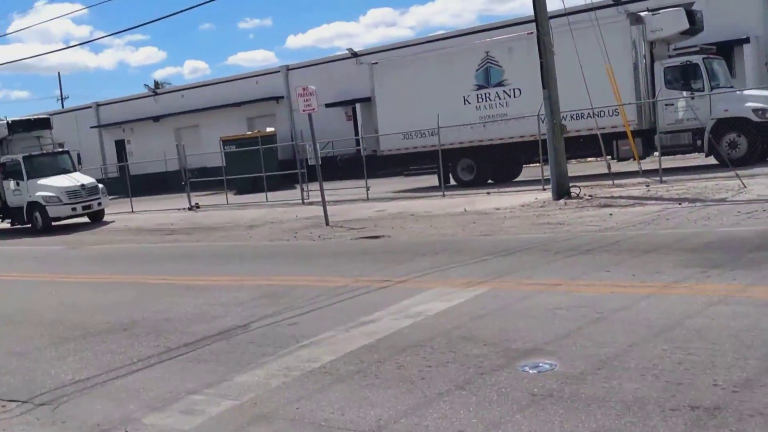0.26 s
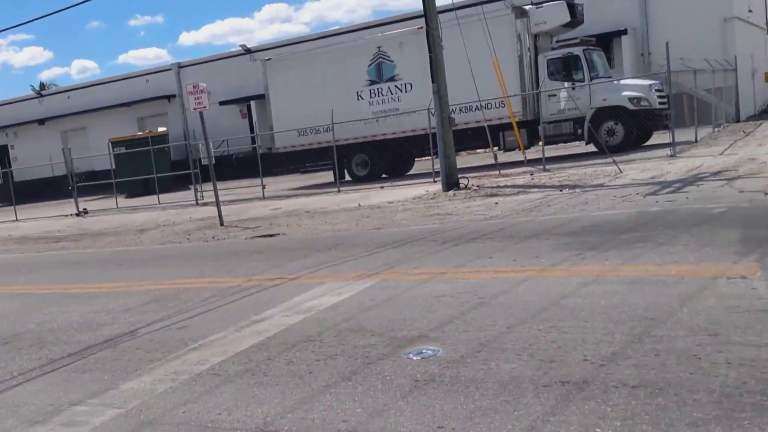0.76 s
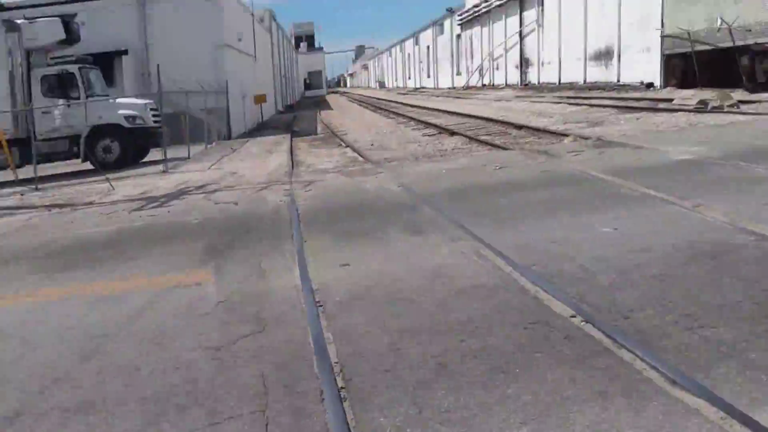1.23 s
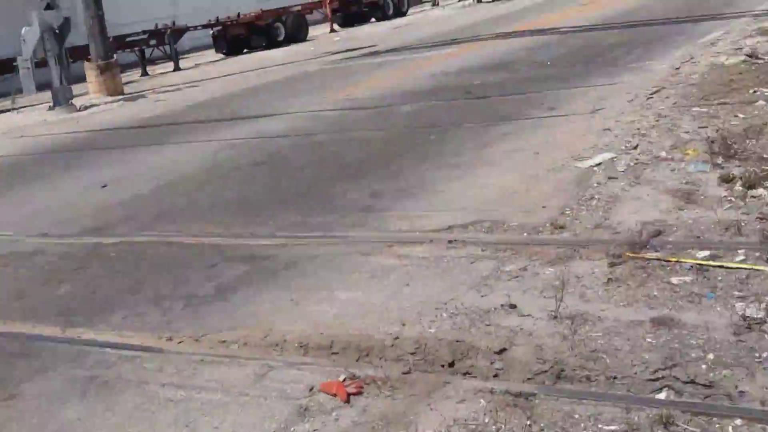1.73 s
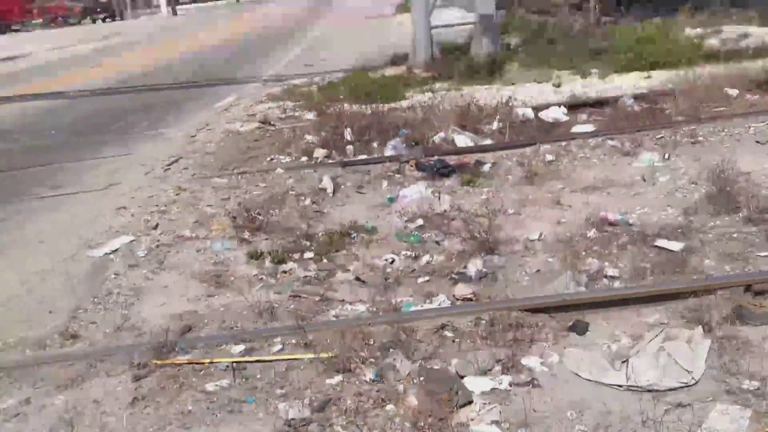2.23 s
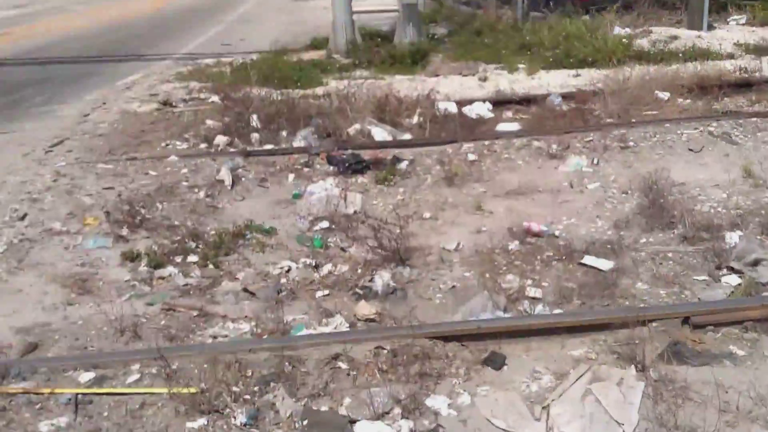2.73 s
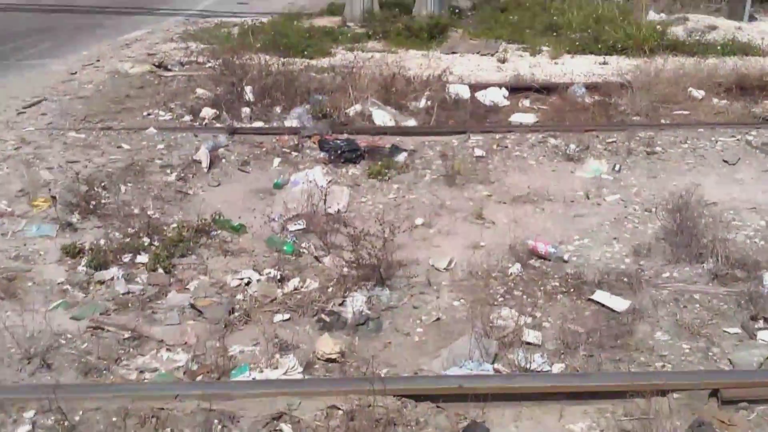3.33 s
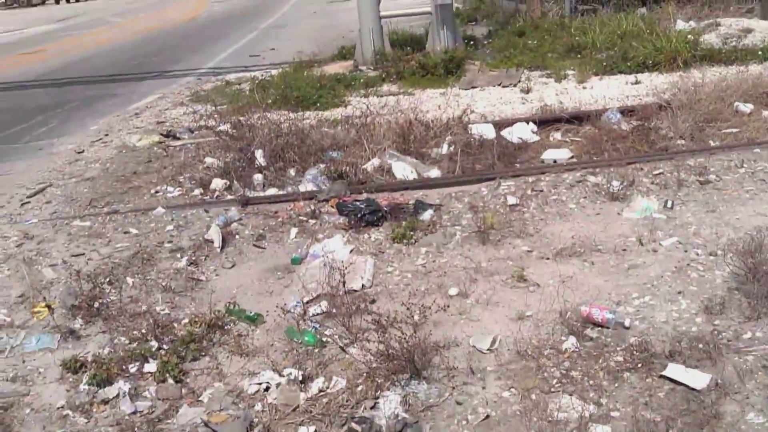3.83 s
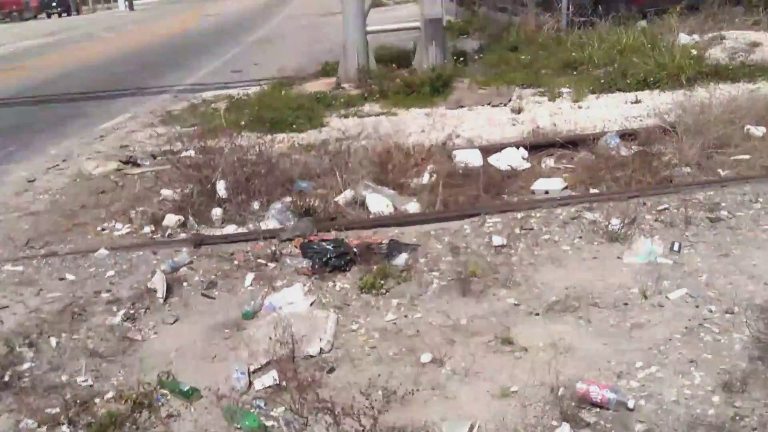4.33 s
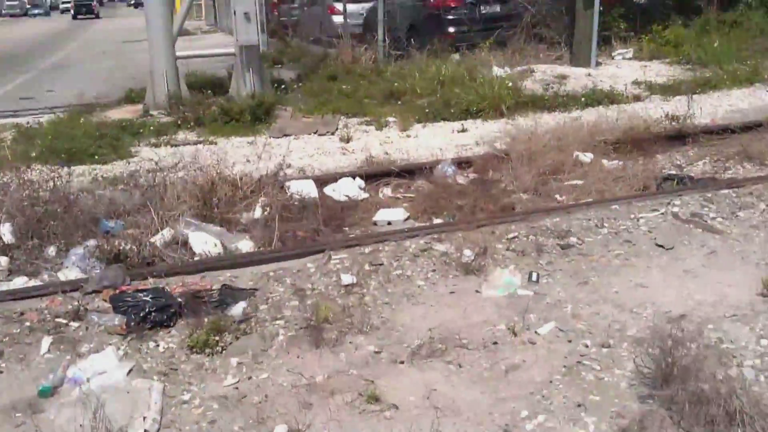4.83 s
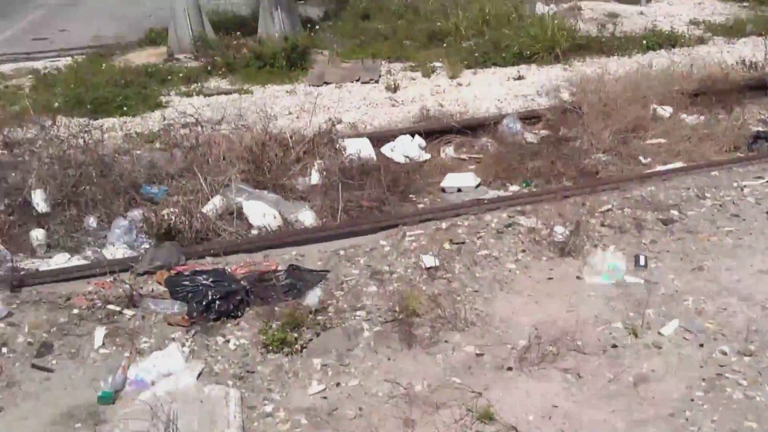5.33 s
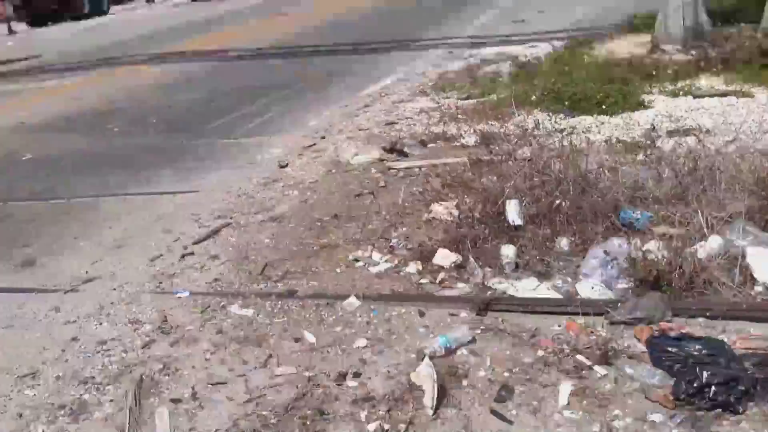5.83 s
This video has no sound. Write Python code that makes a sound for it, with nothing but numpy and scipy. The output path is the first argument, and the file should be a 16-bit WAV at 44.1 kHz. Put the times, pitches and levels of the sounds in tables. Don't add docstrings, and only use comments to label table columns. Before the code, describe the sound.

From the start, a truck releases brake air: a dense, bright hiss with whistling, breathy pipe tones that waver in strength as the camera turns, mostly towards the left, with a stronger spit near 1.3 s. At about 1.74 s a crisp valve snap cuts it dead. A little grit crackles around 1.95 s, then a sharp knock on the camera's left side at 2.0 s pulls the level down; it recovers over a second. Even street traffic remains: low rumble, tyre roar, soft high hiss, an unsteady diesel idle, and muffled lorry growls near 3.9, 4.7 and 5.5 s. Low wind thumps strike one microphone or the other throughout, with a gusty buffet around 3.9 s. Gravel snaps underfoot at 3.4 s, crushes fully at 4.7 to 4.9 s, scuffs at 5.5 s, and crunches again at 5.8 s. Another heavy wind thud dips the level just before the end.

```python
import sys
import numpy as np
from scipy import signal
from scipy.fft import rfft, irfft, next_fast_len
from scipy.io import wavfile
from scipy.ndimage import uniform_filter1d, map_coordinates

SR = 44100
rng = np.random.default_rng(int(sys.argv[2]) if len(sys.argv) > 2 else 0)


def amplitude_ratio(level_db):
    exponent = np.asarray(level_db, float) / 20
    return 10 ** exponent


def wav_out(sig):
    wavfile.write(sys.argv[1], SR, np.round(np.clip(np.atleast_2d(sig).T, -1, 1) * 32767).astype(np.int16))


N = 267554

# (time [s], level [dB], aim at the camera [dB], left against right [dB])
BRAKE_AIR = [(0.0, -32, -6, 0.5), (0.17, -32.5, 2, 1), (0.23, -36, 6.5, 7.5), (0.65, -29.5, -9, 2),
             (0.82, -31, 0.5, 1.5), (1.05, -33, -3, -2), (1.25, -31, -2.5, 7), (1.49, -30.5, 1.5, 1),
             (1.7, -35.5, 3, 4.5)]
# (time [s], half length [s], level [dB])
VALVE = (1.736, .009, -22.5)
# (frequency [Hz], level [dB])
JET_COLOUR = [(5000, -58), (5250, -5.5), (5500, -6.5), (6000, -3.5), (6500, 2), (6900, 3.5), (7600, 0),
              (8400, 1), (9200, -1), (10500, -22)]
WHISTLE_COLOUR = [(7800, -20), (8900, -1), (9800, -2.5), (10400, -2), (10750, -6), (11200, -39)]
NOZZLE_COLOUR = [(900, -43), (1250, -20), (1650, 8), (2000, 4), (2300, 7.5), (2500, -1), (3150, -49),
                 (3280, 7.5), (3600, 6.5), (4000, 3), (4350, -9), (4550, 10), (4700, -5), (5000, -32)]
EDGE_COLOUR = [(10400, -19), (10900, 3), (11900, -1.5), (12700, 3), (13250, 1), (13700, -3), (14200, -3),
               (14500, -26)]
SNAP_COLOUR = [(1500, -20), (2100, -2), (3000, -2), (4500, 0), (5200, -12), (7500, -14), (10000, -3),
               (12000, -7), (14000, -16)]
# (level [dB], share of the aim [ratio])
SIDE_TONES = [
    (-0.3, 0.76),
    (-8.5, 0.16),
    (-7, 0.5),
]
# (frequency [Hz], level [dB])
THROAT_COLOUR = [(2250, -25), (2450, 8.5), (2800, 2), (3020, -9), (3100, -40)]
SHOULDER_COLOUR = [(4550, -32), (4720, 1), (4900, -6), (5100, 9), (5250, -30)]
SPIT_COLOUR = [(4850, -30), (5050, -3), (5300, 7), (5800, -8), (6300, -30)]
# (time [s], level [dB], right port against left [ratio, minus = opposed])
THROAT_SWING = [(0, -45, 0.36), (.12, -45.5, 0.16), (.31, -47, -0.19), (.36, -46, -1.25), (.45, -36, -0.34),
                (.5, -45, -1.25), (.59, -40, -1.25), (.62, -44, -0.2), (.95, -43.5, 0.58),
                (1.23, -40.5, 0.51), (1.27, -41, -1.25), (1.33, -41, -0.29), (1.46, -42, 0),
                (1.49, -45, -1.5), (1.61, -40, -1.4), (1.64, -43, -0.013)]
# (time [s], level [dB])
SHOULDER_SWING = [(0, -52), (.11, -43), (.19, -51), (.36, -47), (.43, -54), (.55, -49), (.62, -41),
                  (.82, -42.5), (1, -43), (1.07, -56), (1.13, -43), (1.26, -33), (1.4, -45), (1.47, -44),
                  (1.52, -58), (1.59, -41), (1.66, -52), (1.7, -41)]
# (time [s], half length [s], level [dB])
SPITS = [
    (.11, .03, -46),
    (.5, 0.066, -47),
    (.8, 0.076, -40),
    (1.13, 0.099, -40),
    (1.27, 0.062, -34.5),
]

# (time [s], half length [s], level [dB])
CRUNCHES = [
    (1.955, 0.0067, -33.5),
    (1.992, 0.015, -37),
    (3.368, 0.011, -34.5),
    (4.746, 0.027, -34.5),
    (4.837, 0.066, -30),
    (4.904, 0.005, -36),
    (5.455, 0.051, -39),
    (5.797, 0.04, -32),
    (5.844, 0.018, -50),
    (5.92, 0.023, -55),
]
# (time [s], peak [dB], pitch [Hz], bright edge [dB])
STONES = [(1.856, -19, 734, -8), (1.952, -22, 700, -11), (3.3596, -8.5, 1210, -15), (3.3695, -8, 744, -27),
          (4.73, -16, 557, -25), (4.751, -9, 662, -18), (4.758, -14, 662, -19), (4.785, -10, 770, -21),
          (4.798, -4, 520, -24), (4.825, -9, 920, -11), (4.843, -19, 624, 8), (4.854, -14, 600, -21),
          (4.861, -12, 500, -22), (4.8765, -7, 700, -26), (4.9, -6, 1020, -22), (4.922, -17, 600, -25),
          (5.596, -11.5, 1020, -9), (5.77, -11, 540, -20), (5.785, -17, 937, -20), (5.792, -11, 900, -20),
          (5.802, -7, 840, -5), (5.8064, -7.5, 960, -6), (5.8115, -10, 650, -20), (5.827, -10, 800, -20),
          (5.844, -11, 700, -22), (5.942, -13, 900, -11)]
# (frequency [Hz], level [dB])
GRIT_COLOUR = [(300, -8), (550, 4.5), (1000, 0.5), (1900, -4), (2500, -8.5), (3500, -13.5), (5000, -14.5),
               (8000, -17)]

# (time [s], peak [dB])
KNOCK = (2.01231, -2.5)
# (time [s], drop [dB], recovery [s])
GUST_DUCK = (5.952, 3.5, .6)

# (time [s], level [dB])
WIND = [(0.0, -31), (0.6, -33), (0.9, -37), (1.8, -29.5), (2.15, -22.5), (2.4, -59), (3.0, -54), (3.9, -26),
        (5.1, -47), (6.0, -38)]
# (time [s], level [dB], length [s], pitch [Hz])
THUMPS = [(0.124, -16, 0.026, 154), (0.176, -17.5, 0.03, 159), (0.321, -22, 0.029, 104),
          (0.411, -19, 0.027, 118), (1.807, -24, 0.02, 107), (1.884, -19, 0.037, 159),
          (1.962, -24, 0.048, 128), (2.009, -21, 0.012, 137), (2.137, -7.5, 0.0042, 155),
          (2.541, -8, 0.011, 148), (3.12, -19, 0.042, 136), (3.219, -17, 0.024, 117),
          (3.373, -18.5, 0.062, 115), (3.719, -15, 0.021, 110), (4.168, -19, 0.018, 158),
          (4.209, -13.5, 0.015, 115), (4.617, -19, 0.037, 119), (4.709, -14, 0.02, 115),
          (4.786, -22, 0.029, 143), (5.213, -16, 0.023, 109), (5.447, -17, 0.015, 94),
          (5.5, -16, 0.015, 138), (5.811, -11, 0.011, 110), (5.868, -14, 0.01, 146),
          (5.927, -14.5, 0.067, 117.5), (6.026, -6, 0.0044, 142)]
# (frequency [Hz], level [dB])
GUST_COLOUR = [(30, -2), (55, 5), (90, 2), (160, 0), (250, -12.5), (400, -15.5), (900, -42)]

# (time [s], level [dB])
TRAFFIC = [(0.0, -33.5), (0.32, -34), (0.6, -31), (0.93, -32), (1.19, -29), (1.49, -32.5), (1.87, -38),
           (2.0, -33.5), (2.5, -30.5), (2.8, -33.5), (3.29, -29.5), (3.63, -31.5), (4.2, -31.5),
           (4.87, -31), (5.1, -32), (5.66, -32), (6.07, -34)]
# (nearest [s], half length [s], tyre gain [dB], hiss gain [dB])
CARS = [
    (.95, 0.57, -1, 10),
    (3.327, 0.33, -1.5, 3.5),
    (4.424, 0.43, -1.9, 2.5),
    (5.154, 0.6, 2.5, 1.5),
    (5.55, .3, 0, -0.5),
    (5.894, 0.19, 0, 3),
]
# (frequency [Hz], level [dB])
ENGINE = [(215, -41), (270, -47.5), (383, -42), (760, -52)]
# (frequency [Hz], level [dB])
RUMBLE_COLOUR = [(30, -8), (50, -1.5), (90, 2.5), (200, -2), (350, -4), (450, -8), (600, -17), (900, -67)]
TYRE_COLOUR = [(300, -15), (600, 1.5), (800, 0), (1200, -5.5), (1900, -8), (2400, -40), (2800, -19.5),
               (3150, -25), (3600, -22.5)]
HISS_COLOUR = [(1700, -15), (2400, -4), (3500, -7.5), (4400, -8), (5000, -4.5), (5900, -5), (7000, -2),
               (8500, -4.5), (9900, 0.5), (11200, -5.5), (12700, -8.5), (13300, -12), (14250, -16),
               (14500, -34)]
# (time [s], left against right [dB])
TURN = [(1.76, 0), (2.1, -0.5), (2.5, -0.5), (3.3, -1), (4.5, 0.5), (4.85, 0), (5.3, 1.5), (5.8, -1)]
# (time [s], half length [s], level [dB])
GROWLS = [
    (3.3, 0.09, -46),
    (3.85, 0.14, -37),
    (4.2, .12, -52),
    (4.7, 0.072, -40),
    (5.05, 0.043, -49),
    (5.47, 0.13, -37),
]
# (frequency [Hz], level [dB])
EXHAUST_COLOUR = [(380, -25), (450, -14), (500, 6), (570, -11), (680, -32)]

# (time [s], half length [s], centre [Hz], half width [Hz])
DIPS = [(.07, .03, 4300, 200), (.45, .06, 4800, 250), (1.07, .04, 4970, 250), (1.222, .09, 4460, 250),
        (1.418, 0.022, 4200, 200), (1.52, .04, 4960, 350), (1.64, 0.022, 4800, 350),
        (0.404, 0.034, 2800, 250), (0.558, .03, 2830, 300), (.2, .015, 6500, 350), (.15, .14, 3130, 70),
        (.9, 0.24, 3100, 70), (1.36, .1, 3120, 70), (.2, 0.23, 2060, 90), (.9, 0.14, 2060, 90),
        (2.6, .1, 2100, 110), (3.53, 0.14, 2070, 110), (4.35, 0.26, 2090, 100), (5.502, .025, 2080, 150),
        (.47, 0.12, 2080, 120), (1.0, .02, 5250, 150), (3.72, 0.046, 4200, 200), (3.17, .012, 4500, 198),
        (3.45, 0.035, 4400, 200), (4.3, 0.036, 4470, 180), (4.82, .04, 4450, 150), (5.3, .03, 4500, 200),
        (5.63, .03, 4500, 200), (6.0, .05, 4600, 150), (1.29, 0.022, 2750, 350), (1.4, .012, 2600, 200),
        (1.5, 0.017, 2900, 400), (1.59, 0.032, 2900, 400), (.26, 0.055, 10800, 350), (.45, .1, 10950, 120),
        (1.54, .045, 11400, 350), (.27, .06, 13700, 400), (.95, 0.046, 13600, 350),
        (1.28, .05, 13400, 300), (2.07, .04, 4300, 250), (2.36, 0.049, 4550, 300), (2.6, 0.041, 4450, 250),
        (2.77, 0.078, 4400, 300), (4.71, .025, 4470, 250), (4.96, 0.063, 4470, 220),
        (5.06, .025, 4560, 300), (5.11, .04, 4880, 130), (5.17, 0.04, 4600, 300),
        (5.532, 0.042, 4550, 220), (5.79, 0.055, 4450, 150)]
# (frequency [Hz], likeness [ratio])
ALIKE = [(100, 0.9), (400, 0.92), (800, 0.098), (1500, 0.046), (3000, 0)]
# (frequency [Hz], share [ratio])
INTO_LEFT = [(100, 0.94), (1100, 0.71), (2300, 0.59), (3400, 0.048), (4600, 0.077), (5700, 0.017),
             (7000, 0.0057)]
INTO_RIGHT = [(100, .92), (1100, .8), (2300, .97), (3400, .98), (4600, .97), (5700, .8), (7000, .58),
              (14000, .5)]
# (frequency [Hz], lag [radians])
CROSS_TURN = [(5700, 0), (6500, .5), (8000, .2), (10000, .9), (12500, 1.4)]


def unit(x):
    return x / np.sqrt(np.mean(x ** 2) + 1e-20)


def along(points, hz):
    f, v = np.transpose(points)
    return np.interp(np.log(hz + 1), np.log(f + 1), v)


def curves(rows):
    s, *cols = np.transpose(rows)
    return [np.interp(np.arange(N) / SR, s, c) for c in cols]


def wobble(rate):
    knots = rng.standard_normal(int(N * rate / SR) + 4)
    return map_coordinates(knots, [np.arange(N) * rate / SR])


def bump(s, half):
    return np.exp(-((np.arange(N) / SR - s) / half) ** 4)


def swells(rows):
    t = np.arange(N) / SR
    return sum(amplitude_ratio(db) * np.exp(-((t - s) / half) ** 2) for s, half, db in rows)


def filtered(x, response):
    m = next_fast_len(N + 8192)
    return irfft(rfft(x, m) * response(np.fft.rfftfreq(m, 1 / SR)), m)[..., :N]


def colour(spectrum):
    closed = [(1, -120)] + spectrum + [(SR / 2, -120)]
    return lambda hz: amplitude_ratio(along(closed, hz))


def rush(spectrum, alike, patchy_db, left_lag=0., size=7):
    z = signal.stft(rng.standard_normal((2, N)), nperseg=512)[2]
    field = uniform_filter1d(rng.standard_normal(z.shape[1:]), size=size, axis=0)
    field = uniform_filter1d(field, size=16, axis=1)
    pair = signal.istft(z * amplitude_ratio(patchy_db * unit(field)), nperseg=512)[1][:, :N]
    turn = lambda hz: np.arccos(np.clip(along(alike, hz), -1, 1)) / 2
    mid, side = filtered(pair, lambda hz: colour(spectrum)(hz) * [np.cos(turn(hz)), np.sin(turn(hz))])
    ports = np.array([mid + side, mid - side])
    return unit(filtered(ports, lambda hz: np.exp(-2j * np.pi * hz * [[left_lag], [0]])))


def facing(pan_db):
    return amplitude_ratio([pan_db / 2, -pan_db / 2])


def brake_air():
    level_db, aim_db, pan_db = curves(BRAKE_AIR)
    whistle_db, nozzle_db, edge_db = (db + share * aim_db + 2.0 * wobble(7.97) for db, share in SIDE_TONES)
    closing_s = .012
    flowing = np.clip((VALVE[0] + closing_s - np.arange(N) / SR) / closing_s, 0, 1)
    jet = amplitude_ratio([[.3], [-6]]) * rush(JET_COLOUR, [(100, 0.057)], patchy_db=3.5, size=4)
    jet = jet + amplitude_ratio(whistle_db) * rush(WHISTLE_COLOUR, [(100, 0.082)], patchy_db=2.5, size=4)
    nozzle = amplitude_ratio([[.3], [-12]]) * rush(NOZZLE_COLOUR, [(100, 0.061)], patchy_db=2.0, size=4)
    jet = jet + amplitude_ratio(nozzle_db) * nozzle
    jet = jet + amplitude_ratio(edge_db) * rush(EDGE_COLOUR, [(100, 0.092)], patchy_db=4.5, size=4)
    flow = amplitude_ratio(level_db + 3.0 + 0.079 * wobble(6.6)) * flowing
    snap = amplitude_ratio(VALVE[2]) * bump(VALVE[0], VALVE[1]) * rush(SNAP_COLOUR, [(100, .2)], patchy_db=1)
    return flow * facing(0.59 * pan_db - 1.5) * jet + snap * amplitude_ratio([[2.5], [-2.5]])


def jet_tones():
    level_db, step = curves(THROAT_SWING)
    flowing = np.arange(N) / SR < VALVE[0]
    tone = rush(THROAT_COLOUR, [(100, 0)], patchy_db=-1.0, size=4)[0]
    low = amplitude_ratio(level_db) * tone * [np.ones(N), step]
    spit = swells(SPITS) * amplitude_ratio([[2.5], [-3]]) * rush(SPIT_COLOUR, [(100, 0)], patchy_db=1.0, size=4)
    upper = rush(SHOULDER_COLOUR, [(100, 0)], patchy_db=2.0, size=4)
    upper = amplitude_ratio(curves(SHOULDER_SWING)[0]) * amplitude_ratio([[1.5], [-6]]) * upper
    return (low + upper) * flowing + spit


def steps():
    load = sum(amplitude_ratio(db) * bump(s, half) for s, half, db in CRUNCHES)
    sizes_db = np.minimum(3 * rng.exponential(size=(2, N)), 6)
    hits = rng.random((2, N)) < 3000 / SR
    grains = hits * amplitude_ratio(sizes_db) * rng.standard_normal((2, N))
    ports = load * unit(filtered(grains, colour(GRIT_COLOUR))) * amplitude_ratio([[4.5], [-5]])
    t = np.arange(400) / SR
    ring = lambda hz, t60: np.sin(2 * np.pi * hz * t) * amplitude_ratio(-60 * t / t60)
    for (s, db, hz, edge_db), luck in zip(STONES, rng.random(len(STONES))):
        snap = ring(hz, .006) + .35 * ring(1800, .004) + amplitude_ratio(edge_db) * ring(3600, .004)
        ports[:, round(s * SR):][:, :len(t)] += amplitude_ratio(db - 6.0) * snap * [[1], [0.37 * luck + 0.34]]
    return ports


def knock():
    u = np.arange(N) / SR - KNOCK[0]
    tick = np.exp(-np.abs(u) / .000016)
    suck = -.25 * np.exp(-((u - .0005) / .0004) ** 2)
    shove = .2 * np.exp(-((u + .0009) / .0011) ** 2)
    shove = shove - .3 * np.exp(-((u - .0009) / .0005) ** 2)
    return amplitude_ratio(KNOCK[1]) * np.array([tick + shove, suck])


def small_eddies(count):
    luck = rng.standard_normal((count, 4))
    s = (np.arange(count) + .5 + .3 * luck[:, 0]) * N / SR / count
    level_db = -27 + 5.5 * luck[:, 1]
    length_s = 0.034 * np.exp(0.32 * luck[:, 2])
    pitch_hz = 115 * np.exp(0.11 * luck[:, 3])
    return np.transpose([s, level_db, length_s, pitch_hz])


def wind():
    lumps_db = 3.5 * np.array([wobble(18), wobble(18)])
    ports = amplitude_ratio(curves(WIND)[0] + lumps_db - 2.5) * rush(GUST_COLOUR, [(100, 0)], patchy_db=3.0)
    t = np.arange(N) / SR
    eddies = np.vstack([THUMPS, small_eddies(count=35)])
    for (s, db, length, hz), (port, phase) in zip(eddies, rng.random((len(eddies), 2))):
        near = slice(max(int((s - .1) * SR), 0), max(int((s + .1) * SR), 0))
        u = t[near] - s
        swing = 2 * np.pi * (hz * u * (1 - 4 * u) + phase)
        shove = np.sin(swing) + 0.14 * np.sin(2 * swing + 1) + 0.15 * np.sin(3 * swing + 2)
        swell = np.exp(-.5 * (u / (0.27 * length)) ** 2)
        ports[int(2 * port), near] += amplitude_ratio(db + 3.5) * swell * shove
    return ports


def seeping_air():
    leak_db, leak_s = 0.5, 0.16
    since = np.arange(N) / SR - VALVE[0]
    seep_db = leak_db * (since < leak_s) * (1 - (since / leak_s) ** 2)
    return np.where(since < 0, -13, seep_db)


def traffic():
    (level_db,), (pan_db,) = curves(TRAFFIC), curves(TURN)
    t = np.arange(N) / SR
    car_tyre_db, car_hiss_db = np.zeros((2, N))
    for s, half, tyre_db, hiss_db in CARS:
        passing = np.exp(-((t - s) / half) ** 2)
        car_tyre_db += tyre_db * passing
        car_hiss_db += hiss_db * passing
    rumble_db = level_db + 5.5 + 0.89 * wobble(9)
    rumble = amplitude_ratio(rumble_db) * rush(RUMBLE_COLOUR, ALIKE, patchy_db=-0.38, left_lag=0.00021)
    tyres_db = level_db - 5 + car_tyre_db + .6 * wobble(11)
    tyres = amplitude_ratio(tyres_db) * rush(TYRE_COLOUR, ALIKE, patchy_db=1.0, left_lag=.00005)
    hiss_db = -36.5 + 0.084 * (level_db - level_db.mean()) + car_hiss_db + seeping_air() + 0.6 * wobble(4.76)
    hiss = amplitude_ratio(hiss_db) * facing(2.5 * pan_db - 0.5) * rush(HISS_COLOUR, [(100, 0.0044)], patchy_db=1.23)
    lines = sum(amplitude_ratio(db + 4.4 * wobble(8)) * np.sin(2 * np.pi * hz * t + 2.7 * wobble(14)) for hz, db in ENGINE)
    diesel = amplitude_ratio(level_db + 35.0) * lines * [[.7], [1]]
    return rumble + tyres + hiss + diesel


def growl():
    exhaust = rush(EXHAUST_COLOUR, ALIKE, patchy_db=2.5, left_lag=0.000098)
    return swells(GROWLS) * amplitude_ratio(1.6 * wobble(12)) * exhaust


def dipped(x):
    hz, t, z = signal.stft(x, SR, nperseg=512)
    depth = 0
    for s, half, centre_hz, width in DIPS:
        depth = depth + np.exp(-((t - s) / half) ** 4 - ((hz[:, None] - centre_hz) / width) ** 4)
    null_db = -18
    return signal.istft(z * amplitude_ratio(null_db * np.minimum(depth, 1)), SR, nperseg=512)[1][:, :N]


def scene():
    air = dipped(traffic() + brake_air() + jet_tones()) + wind() + steps() + growl()
    top_hz = 14340
    return filtered(air, lambda hz: hz < top_hz) + knock()


def ducking():
    t = np.arange(N) / SR
    drops = [(KNOCK[0] + .0015, 8, 1.01), GUST_DUCK]  # (time [s], drop [dB], recovery [s])
    return amplitude_ratio(sum(-db * (t > s) * np.clip(1 - (t - s) / back, 0, 1) for s, db, back in drops))


def band_limit(x):
    return signal.sosfilt(signal.butter(12, 15520, fs=SR, output="sos"), x)


def record(dry):
    cross_lag_s = .00044
    phase = lambda hz: 2 * np.pi * hz * cross_lag_s + along(CROSS_TURN, hz)
    late = lambda hz: np.exp(-1j * phase(hz)) * [along(INTO_LEFT, hz), along(INTO_RIGHT, hz)]
    wide = ducking() * (dry - filtered(dry[::-1], late))
    return band_limit(wide)


dry = scene()
out = record(dry)
wav_out(out)
```